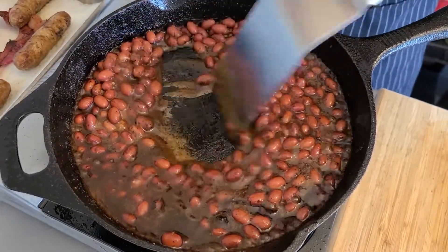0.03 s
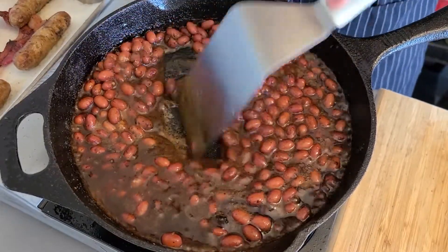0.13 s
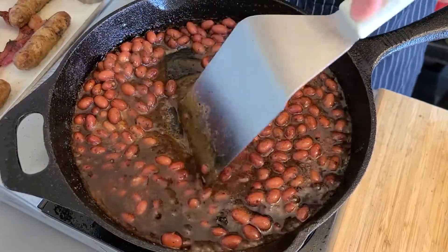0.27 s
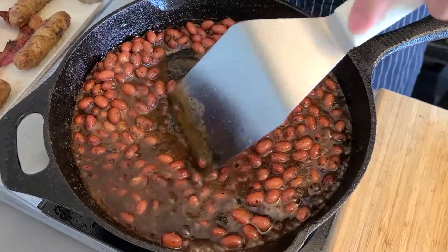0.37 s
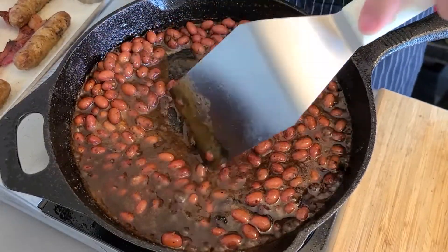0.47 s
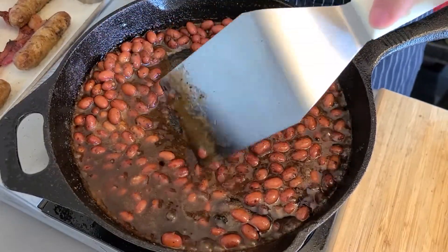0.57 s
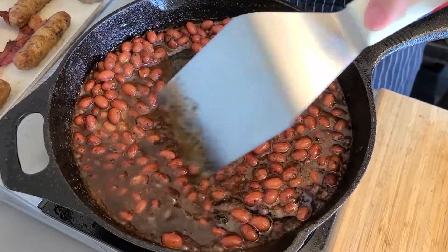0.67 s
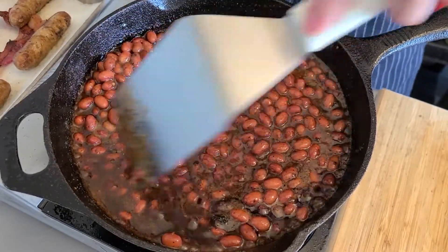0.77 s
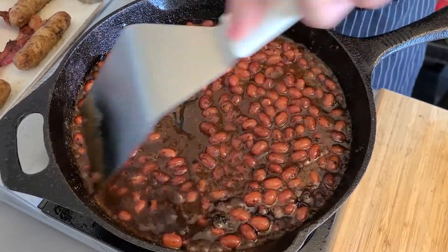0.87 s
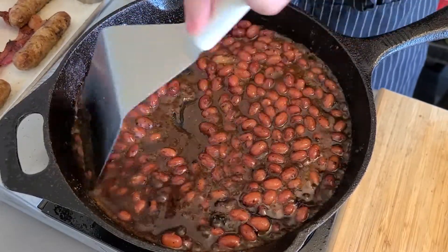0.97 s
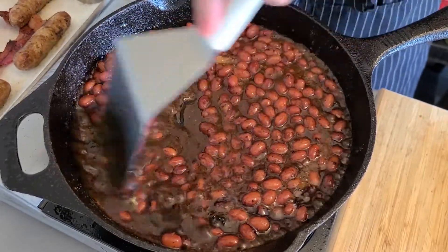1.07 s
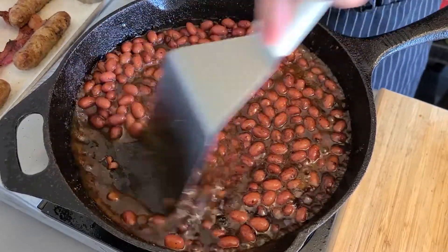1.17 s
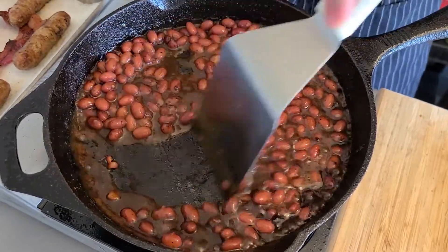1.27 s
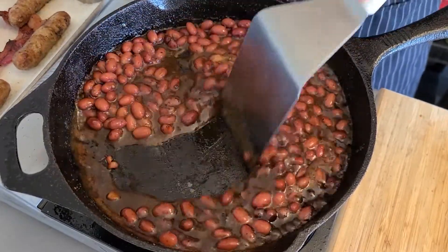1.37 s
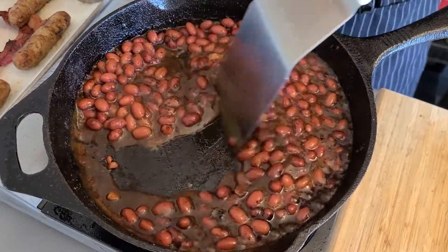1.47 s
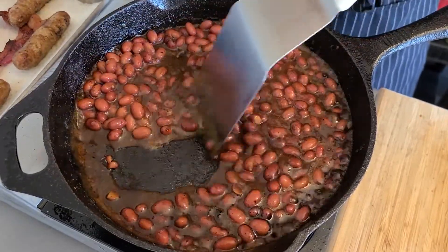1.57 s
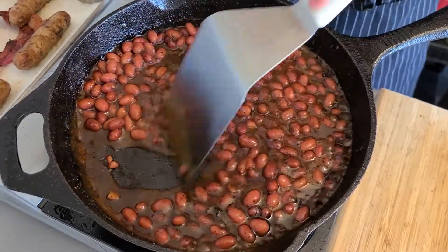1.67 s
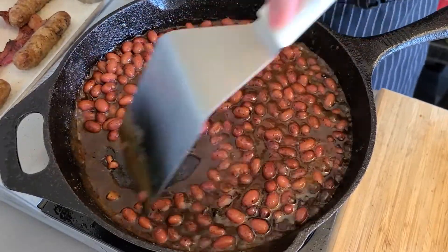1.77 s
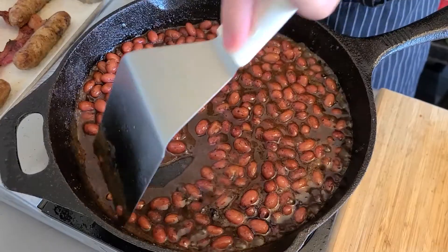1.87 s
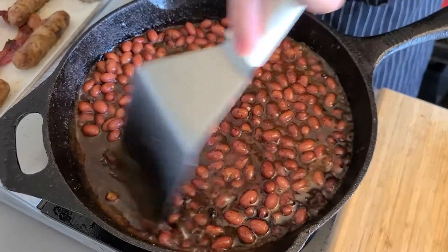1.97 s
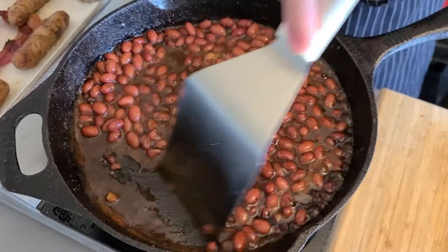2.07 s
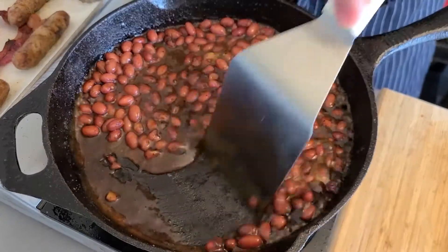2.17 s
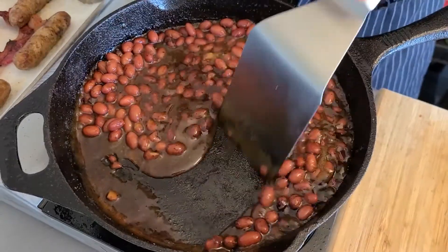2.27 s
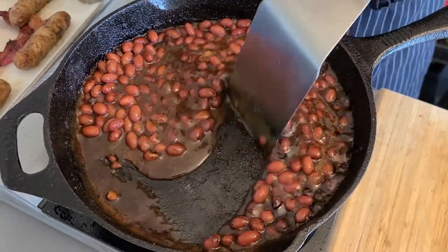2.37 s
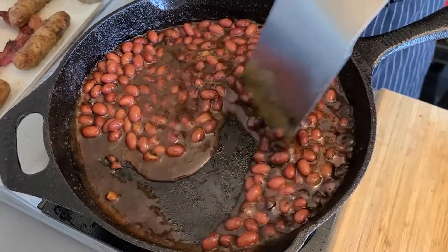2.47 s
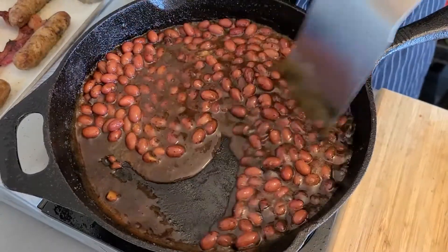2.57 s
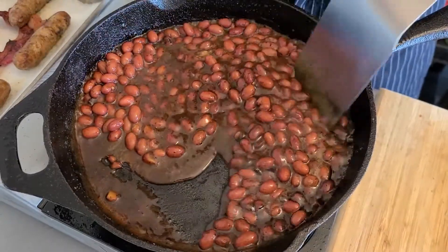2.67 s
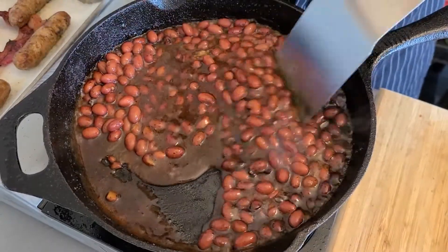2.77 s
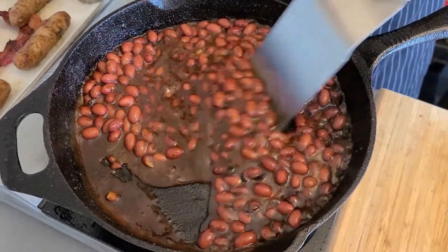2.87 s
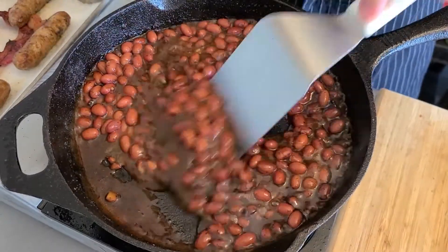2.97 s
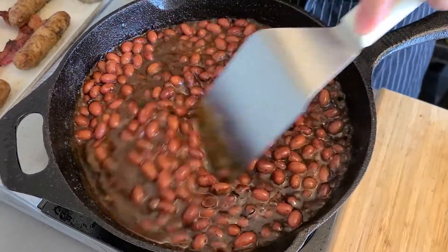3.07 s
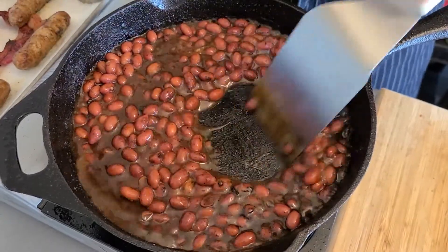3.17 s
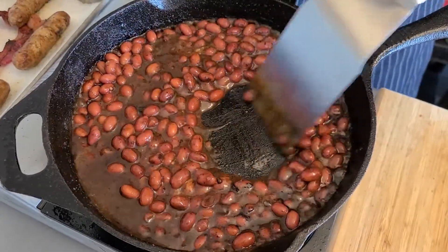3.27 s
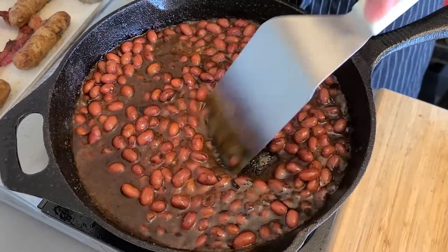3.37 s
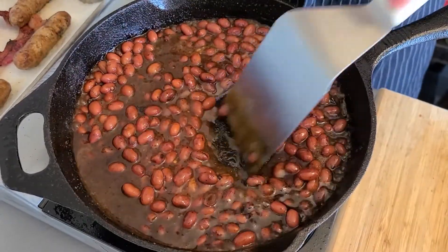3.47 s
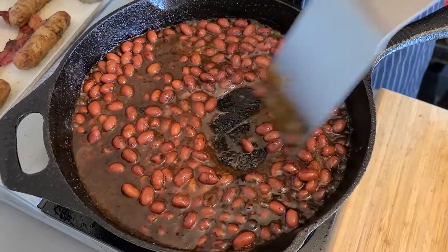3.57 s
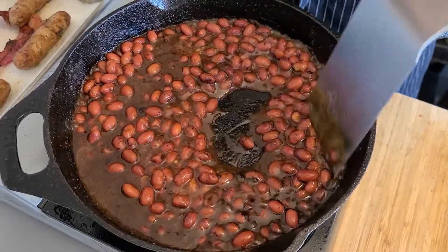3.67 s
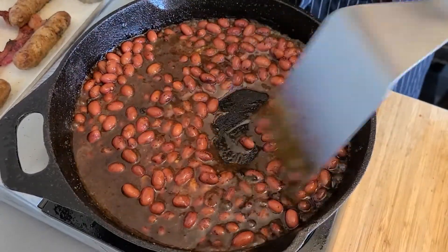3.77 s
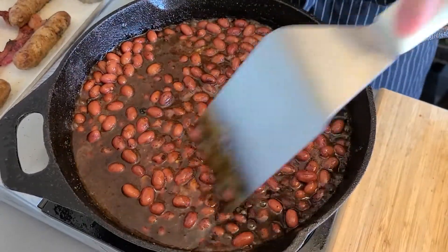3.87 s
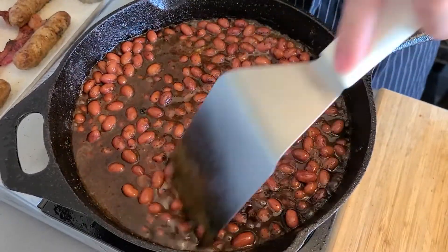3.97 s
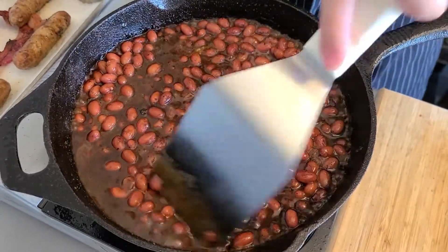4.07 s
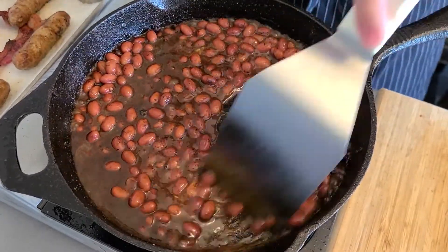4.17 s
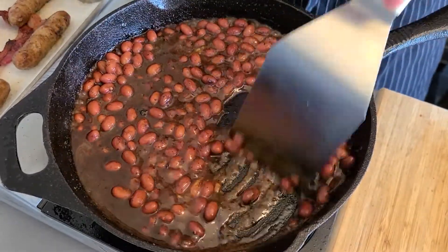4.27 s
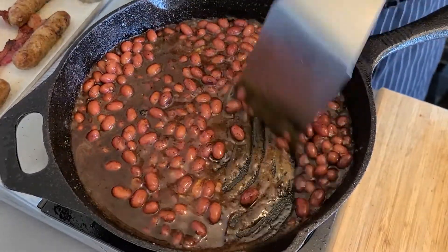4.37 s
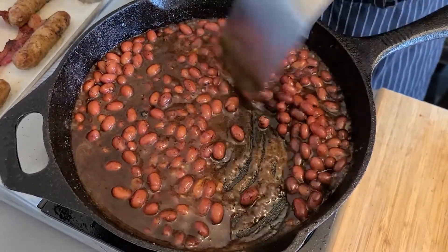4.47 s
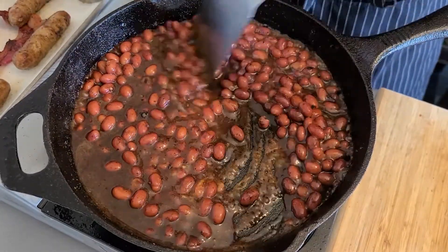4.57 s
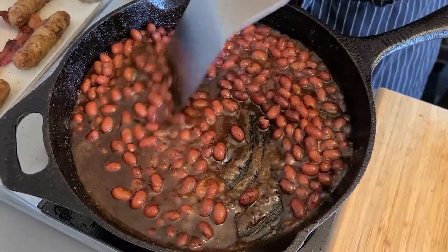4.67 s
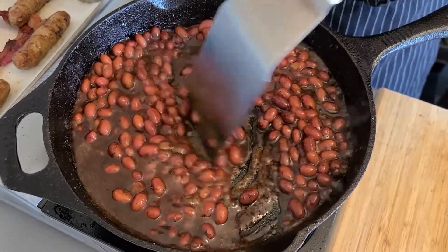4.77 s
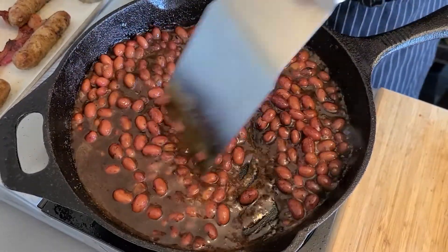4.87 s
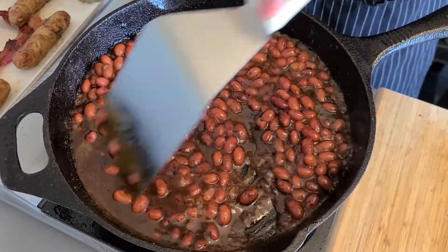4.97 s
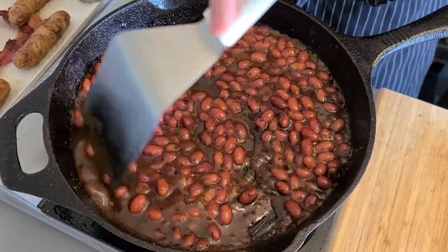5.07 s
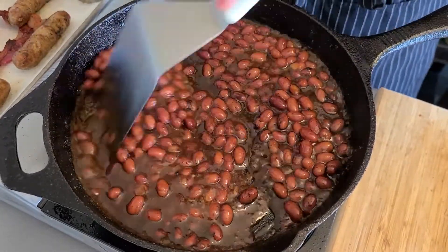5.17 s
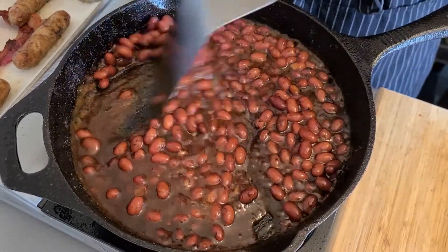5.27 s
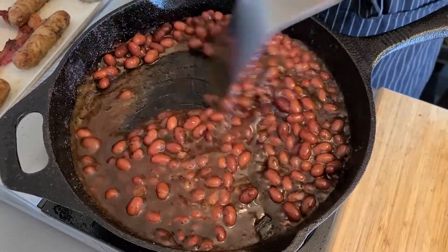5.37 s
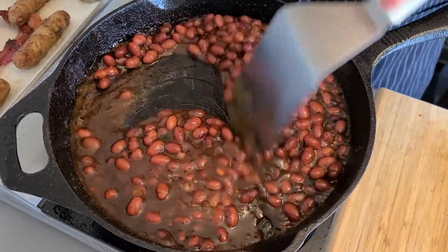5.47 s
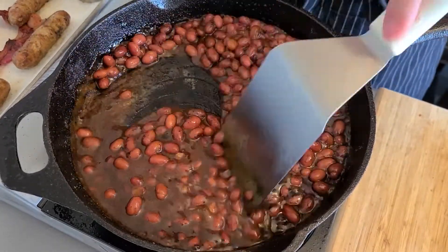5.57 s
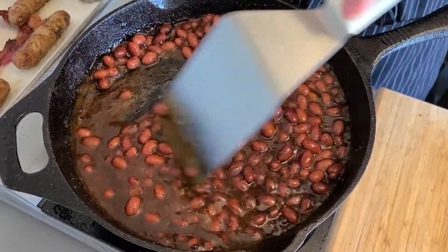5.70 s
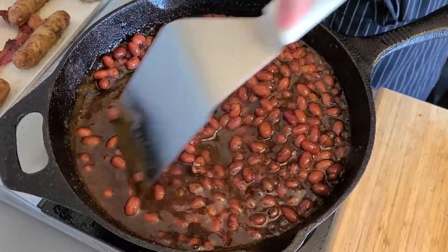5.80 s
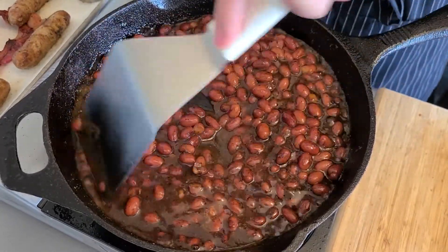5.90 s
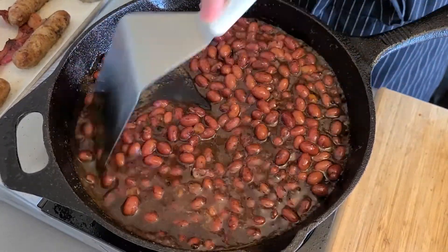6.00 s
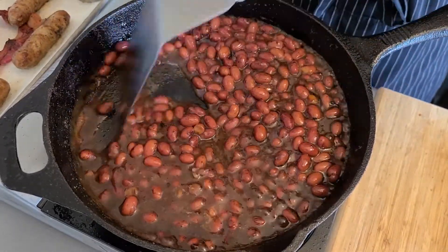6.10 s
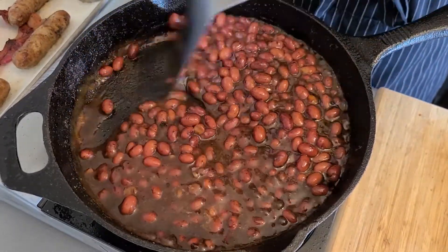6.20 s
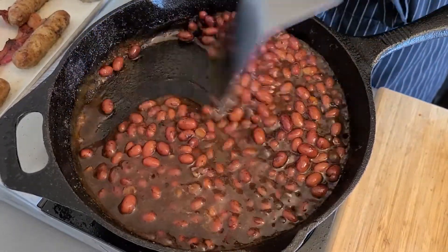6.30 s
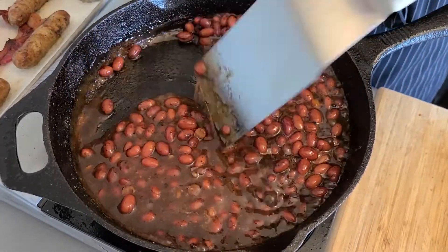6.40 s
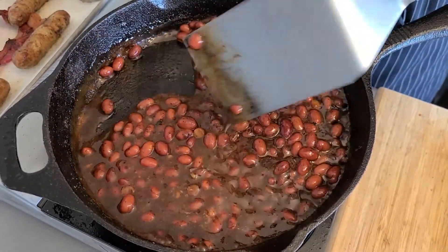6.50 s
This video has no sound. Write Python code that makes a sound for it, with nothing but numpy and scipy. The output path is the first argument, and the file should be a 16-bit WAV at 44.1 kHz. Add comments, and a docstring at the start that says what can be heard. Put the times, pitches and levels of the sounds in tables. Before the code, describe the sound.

A steel spatula scrapes and taps a cast-iron skillet in repeated gritty strokes, over a faint simmer and hob hum.

```python
"""A steel spatula stirs saucy beans in a cast-iron skillet, close by in a small kitchen.
From the start the hob hums and whines faintly, the sauce simmers, and the blade gives one short scrape.
Then, about once a second, it taps down and is pushed over the gritty iron: each slip sets blade and pan
ringing, and at times friction locks to one mode, which judders or sings. The walls reflect each stroke.
The last push dies away after about 6.3 s, leaving the hob and the sauce."""
import sys
import numpy as np
from scipy import signal
from scipy.fft import rfft, irfft
from scipy.io import wavfile
from scipy.ndimage import uniform_filter1d

SR = 44100
rng = np.random.default_rng(int(sys.argv[2]) if len(sys.argv) > 2 else 0)


def unload_wav(signal):
    """Save mono or channel-first audio to the path in sys.argv[1] as 16-bit WAV at rate SR, clipped to [-1, 1]."""
    wavfile.write(
        sys.argv[1],
        SR,
        np.round(np.clip(np.atleast_2d(signal).T, -1, 1) * 32767).astype(np.int16),
    )


N = 288414
TIME = np.arange(N) / SR

# Room rumble rising into the sizzle of the sauce: frequency_hz, density_db (power per hertz)
AMBIENT_SPECTRUM = [(10, -84.5), (40, -78.5), (85, -79.5), (200, -85), (600, -88.5), (1000, -90.5),
                    (2000, -92.5), (4000, -95), (7500, -95.5), (9500, -101), (12500, -99), (15500, -101)]
# Likeness of left and right in the room's sound: frequency_hz, coherence_ratio
ROOM_COHERENCE = [(50, 0.967), (200, 0.925), (700, 0.425), (2000, 0.052), (15000, 0.73)]
# Mains hum of the hob: pitch_hz, level_db
MAINS_HUM = [(59.6, -55.5), (118.6, -58.5)]
# Reverberation time of the kitchen: frequency_hz, t60_s
ROOM_DECAY = [(200, 0.2329), (700, 0.4013), (2500, 0.324), (7000, 0.4238), (14000, 0.03)]
# Strength of its reflections: frequency_hz, gain_db
ROOM_GAIN = [(200, -7), (600, -10), (1500, -7), (4000, -4.5), (8000, -14.5), (14000, -16.5)]
# Phase by which the left channel leads the right: frequency_hz, lead_rad
PHASE_LEAD = [(200, 0.23), (600, 0.27), (1400, 0.88), (2300, 0.83), (3200, 1.42), (4400, -1.6), (5400, 1.1),
              (6500, -.4), (10000, -.1), (16000, -.4)]
# Likeness of left and right in the direct sound: frequency_hz, coherence_ratio
DIRECT_COHERENCE = [(200, 0.989), (700, 0.9927), (1200, 0.515), (2300, 0.4), (3500, 0.122), (7500, 0.495),
                    (10000, 0.894), (16000, 0.48)]
# Resonances of blade and pan: frequency_hz, width_hz, height_db, left_minus_right_db
PAN_MODES = [(223.5, 44, 5, 0.5), (289, 27, 1.5, 0), (412, 73, 9.5, -0.5), (538.3, 85.2, 10.5, 0.33),
             (619.1, 86, 17, 3.5), (726.1, 98, 12, -1.6), (758.6, 10.3, 7, 9), (1101.7, 132, 6, 2),
             (1259, 59.3, 8, 0.5), (1424.3, 153, 8, 2), (1651, 51, 3.5, 7.5), (1843.7, 90, 7.5, -4),
             (2021.3, 143, 5.5, 3.5), (2273, 196, 3, -2.5), (2636.2, 32.7, 8.5, 3.5), (2792, 82, 1.5, -0.5),
             (3177.3, 238, 9, 3), (3648, 362, 6.5, -4.5), (4009, 215, 11, -4), (4326, 64, 6.5, -5.5),
             (4753, 240, 8, 0), (5312, 489, 11.5, -3.5), (6157, 790, 7, 0.26), (7061.6, 381, 12.5, -1.35),
             (8204, 680, 11, 9.5), (9063, 196, 6.5, -7.5), (10131, 757, 11.5, -1), (11566, 1390, 8, -3.8),
             (12427, 940, 11, 1), (15070, 2070, 9.5, -0.9)]
# The dense modes beneath those peaks: frequency_hz, relative_level_db
PAN_FLOOR = [(150, -30.5), (350, -31), (600, -25.5), (900, -25), (1200, -23), (2500, -27.5), (5000, -32.5),
             (7500, -33), (9500, -42.5), (15500, -42.5)]
# One blade mode sings as the contact passes it: peak_s, sigma_s, pitch_hz, relative_level_db
SINGING_MODES = [(1.103, 0.00407, 1990, -30.5), (1.103, 0.00417, 3170, -33), (1.103, 0.00423, 1421, -28.5),
                 (1.104, 0.00425, 5226, -30.5), (1.218, 0.0284, 5297, -32.5), (1.502, 0.014, 1118, -27),
                 (2.036, 0.00923, 1068, -23), (2.913, 0.0141, 1853, -27), (2.934, 0.0267, 3900, -28),
                 (2.969, 0.014, 3249, -23), (3.17, .012, 1291, -26.5), (3.367, 0.015, 3240, -22.5),
                 (3.376, .01, 2293, -24), (3.39, .011, 1293, -24.5), (4.051, 0.0168, 2594, -36.5),
                 (4.21, .05, 5350, -40), (4.224, .015, 11930, -31), (4.392, .035, 5354, -40),
                 (4.598, 0.00688, 829.6, -27.5), (4.602, 0.00732, 1145, -23), (4.637, 0.0165, 3229, -23),
                 (4.634, 0.0193, 3631, -27.5), (6.157, 0.01227, 1461, -22.5)]
# The blade sticks and slips in step with a bending mode: peak_s, rise_s, fall_s, pitch_hz, left_level_db
BLADE_JUDDERS = [(.072, 0.0396, 0.0228, 629, -23), (1.257, 0.0056, 0.0055, 580.8, -18.5),
                 (1.493, 0.0032, 0.0125, 610, -14.5), (2.147, 0.0118, 0.0174, 216, -33),
                 (2.799, 0.00415, 0.0142, 602, -27.5), (2.837, 0.00195, 0.0045, 616, -32),
                 (2.971, 0.0038, 0.00355, 624.1, -12), (3.281, 0.0031, 0.0103, 602, -27.5),
                 (3.326, 0.0135, 0.0074, 632.5, -13), (3.346, 0.0055, 0.0068, 615, -14),
                 (3.368, 0.007, 0.0072, 615, -10), (3.408, 0.0083, 0.0067, 605, -25),
                 (3.512, 0.0129, 0.0121, 599, -37.5), (4.587, 0.00216, 0.0134, 604.6, -13),
                 (4.63, 0.0087, 0.0157, 629.1, -18.5), (4.688, 0.0155, 0.0209, 600.3, -23.5),
                 (5.946, 0.00835, 0.00776, 620, -20), (6.07, 0.0184, 0.0405, 737, -26)]
# The edge lands or catches hard: start_s, relative_level_db
EDGE_TAPS = [(1.0974, -16), (1.1568, -22.5), (1.8855, -18.5), (2.0313, -14.5), (3.1492, -18), (3.175, -15),
             (4.0178, -12), (4.1944, -14.5), (4.2009, -13.5), (4.2208, -15.5), (4.2433, -16.5),
             (4.362, -24), (4.5835, -18.5), (4.6074, -21), (5.1267, -18.5), (5.2076, -24.5), (5.3288, -26),
             (5.3527, -18.5), (5.9234, -13.5), (6.097, -19)]
# Pushes over the iron: start_s, attack_s, hold_s, pressure_db, flex_db, bite_db, thud_db
# The last three (blade bending, grit, pan body) are relative to the pressure.
BLADE_PUSHES = [(0, 0.00067, 0.0067, -24.5, -3, -1, -14.5), (0.028, 0.0281, 0.031, -33, 5, -4, -15.5),
                (0.935, 0.00522, 0.041, -34.5, 3, .5, -24.5), (1.093, 0.00217, 0.0061, -31, 3, 0.5, -11.5),
                (1.165, 0.038, 0.0388, -21.5, 2, -0.5, -5.5), (1.259, 0.016, 0.0416, -39, -2.5, -1, -3.5),
                (1.414, 0.0707, 0.0186, -35, 10, -11, -8), (1.53, 0.0121, 0.0244, -41.5, 8.5, -11, -8),
                (1.878, .008, 0.048, -31.5, 3, 0.5, -15.5), (1.955, 0.0598, 0.0466, -23, 3.5, -4, -6.5),
                (2.064, 0.0354, 0.0311, -26, 4.5, -0.5, -2.5), (2.171, 0.0325, 0.0588, -44, 6, -4, 0),
                (2.277, 0.0447, 0.0274, -34, 3, -4, -7.5), (2.781, 0.0095, 0.0163, -35.5, 4.5, -6.5, -10.5),
                (2.832, 0.0874, 0.027, -27.5, 4.5, -6, -14.5), (2.908, 0.0431, 0.0541, -24, 0.5, -2.5, -24),
                (3.136, 0.027, 0.0166, -29, 1.5, 5, -24.5), (3.29, 0.0577, 0.0354, -23.5, 2.5, -1.5, -26),
                (4.017, 0.00299, 0.0253, -35.5, 3.5, -3, -17), (4.069, 0.0611, 0.074, -28, 0.5, -5, -13.5),
                (4.168, 0.0275, 0.0376, -26, 0.5, -2.5, -8.5), (4.261, 0.0164, 0.023, -35, 0, -2, -10.5),
                (4.336, 0.0254, 0.0834, -34, -1, -6.5, -12.5), (4.583, 0.00105, 0.0263, -24.5, 4, -10, -27),
                (4.592, 0.0203, 0.0587, -28, 3.5, -5, -19.5), (5.13, 0.00186, 0.0102, -36, -8, -.5, -26.5),
                (5.176, 0.0259, 0.0369, -37.5, -6, 2.5, -14.5), (5.338, 0.0175, 0.0526, -30, 0, -1, -14),
                (5.402, 0.0611, 0.0706, -33.5, 4.5, 4, -11), (5.921, 0.00414, 0.0227, -29.5, -1, 2, -27),
                (5.995, 0.0333, 0.0168, -27, 3.5, -2, -7), (6.071, 0.069, 0.0753, -29, 3.5, -0.5, -11),
                (6.203, 0.0492, 0.0602, -27.5, 0, -1.5, -10.5)]


def gain_of(db):
    """Amplitude grows tenfold for every 20 dB."""
    return 10 ** (np.asarray(db) / 20)


def unit_rms(x):
    """Normalisation to a mean power of 1."""
    return x / np.sqrt(np.mean(x ** 2) + 1e-20)


def curve_at(points, hz):
    """Interpolation of a spectrum on a logarithmic frequency axis."""
    frequencies, values = np.transpose(points)
    return np.interp(np.log(hz + 1), np.log(frequencies + 1), values)


def wander(hz):
    """Smooth random modulation of rms 1, with a bandwidth of roughly hz."""
    knots = rng.standard_normal(8192)
    position = np.minimum(TIME * 2 * hz, len(knots) - 2)
    k = position.astype(int)
    ease = (position - k) ** 2 * (3 - 2 * (position - k))
    return unit_rms(knots[k] * (1 - ease) + knots[k + 1] * ease)


def impulses(per_s, spread_db):
    """A Poisson process: independent impulses, mostly small and a few large."""
    sizes = gain_of(spread_db * np.minimum(rng.exponential(1, N), 4))
    return sizes * (rng.random(N) < per_s / SR)


def convolve(x, response):
    """A linear system's output is its input convolved with its impulse response."""
    return signal.oaconvolve(np.atleast_2d(x), response, axes=1)[:, :N]


def stereo_pair(left, other, coherence):
    """Partial coherence: the right channel shares a part of the left at each frequency."""
    shared = np.clip(curve_at(coherence, np.fft.rfftfreq(N, 1 / SR)), -1, 1)
    right = irfft(shared * rfft(left) + np.sqrt(1 - shared ** 2) * rfft(other), N)
    return np.array([left, right])


def pan_ring(lo_hz, hi_hz, ripple_db=0, size=4096, order=10):
    """Modal resonance: the impulse response of blade and pan in one band, with unit mid-channel energy."""
    hz = np.fft.rfftfreq(size, 1 / SR) + 1
    sides = np.array([[.5], [-.5]])
    peaks_db = sum((height + sides * balance) / (1 + (2 * (hz - centre) / width) ** 2)
                   for centre, width, height, balance in PAN_MODES)
    # each point of contact favours its own random set of the dense modes
    grid = np.linspace(0, np.sqrt(SR / 2), num=170)
    ripple = np.interp(np.sqrt(hz), grid, rng.standard_normal(len(grid)))
    # short waves reach left and right with different peaks and dips
    apart = np.minimum(hz / 6000, 1) * np.interp(np.sqrt(hz), grid, rng.standard_normal(len(grid)))
    db = curve_at(PAN_FLOOR, hz) + peaks_db + ripple_db * (ripple + sides * apart)
    gain = gain_of(db) / np.sqrt((1 + (lo_hz / hz) ** order) * (1 + (hz / hi_hz) ** order))
    # folding the cepstrum gives a causal, minimum-phase ring
    cepstrum = irfft(np.log(gain + 1e-6))
    cepstrum[:, 1:size // 2] *= 2
    cepstrum[:, size // 2:] = 0
    spectrum = np.exp(rfft(cepstrum))
    spectrum[1] *= np.exp(-1j * curve_at(PHASE_LEAD, hz))
    ring = np.roll(irfft(spectrum), 16, axis=1)[:, :size // 2]
    return ring / np.linalg.norm(ring.mean(0))


def rumble_and_sizzle(flutter_db=0.5):
    """Spectrally shaped noise: the room's low rumble and the soft, slightly uneven sizzle of the sauce."""
    colour = gain_of(curve_at(AMBIENT_SPECTRUM, np.fft.rfftfreq(N, 1 / SR))) * np.sqrt(SR / 2)
    noise = stereo_pair(*rng.standard_normal((2, N)), ROOM_COHERENCE)
    noise *= gain_of(flutter_db * wander(hz=30.94))
    return irfft(rfft(noise) * colour, N)


def hob(whine_hz=6892.6, whine_db=-58.5, drift_hz=16, pulse_depth=0.515, flicker_db=3.5):
    """Amplitude modulation: a thin whine pulses at the mains frequency, above the mains hum."""
    hum = sum(gain_of(db) * np.sin(2 * np.pi * np.cumsum(hz + 0.295 * wander(hz=2.35)) / SR)
              for hz, db in MAINS_HUM)
    phase = 2 * np.pi * np.cumsum(whine_hz + drift_hz * wander(hz=59.94)) / SR
    mains_hz = MAINS_HUM[0][0]
    pulse = gain_of(whine_db) * (1 + pulse_depth * np.sin(2 * np.pi * mains_hz * TIME))
    # the moving hand shifts the whine's reflections, differently on each side
    whine = np.zeros((2, N))
    for side in range(2):
        flicker = gain_of(flicker_db * wander(hz=17))
        whine[side] = pulse * flicker * np.sin(phase + 1.154 * wander(hz=9.1))
    hum *= 1 + 0.061 * wander(hz=8)
    return np.sqrt(2) * (hum + whine)


def simmer(level_db=-68):
    """Shot noise: tiny bubbles burst in the sauce and excite the pan's upper modes."""
    pops = unit_rms(impulses(per_s=90, spread_db=4.0))
    return gain_of(level_db) * convolve(pops, pan_ring(lo_hz=1468, hi_hz=14700))


def kitchen_reverb(direct, delay_s=0.0043, echoes_per_s=3000):
    """Reverberation: reflections from counter and walls decay exponentially, each band at its own rate."""
    echoes = rng.choice([-1., 1.], (2, SR)) * (rng.random((2, SR)) < echoes_per_s / SR)
    echoes[:, :round(delay_s * SR)] = 0
    hz, t, bands = signal.stft(echoes, SR, nperseg=256)
    shared = np.clip(curve_at(ROOM_COHERENCE, hz), 0, 1)[:, None]
    bands[1] = shared * bands[0] + np.sqrt(1 - shared ** 2) * bands[1]
    decay_per_s = np.log(1000) / curve_at(ROOM_DECAY, hz)[:, None]
    envelope = np.exp(-decay_per_s * t) * np.sqrt(2 * decay_per_s)  # unit energy
    bands *= gain_of(curve_at(ROOM_GAIN, hz))[:, None] * envelope
    response = signal.istft(bands, SR, nperseg=256)[1] / np.linalg.norm(echoes[0])
    return convolve(direct, response)


def singing(gain_db=-2, base_width_hz=45, width_share=0.0047):
    """Narrow-band resonance: friction feeds a single mode for a moment, giving a fuzzy metallic tone."""
    out = np.zeros((2, N))
    for peak_s, sigma_s, hz, db in SINGING_MODES:
        near = abs(TIME - peak_s) < 3 * sigma_s
        t = TIME[near] - peak_s
        pole = np.exp(-np.pi * (base_width_hz + width_share * hz) / SR)
        fuzz = signal.lfilter([1], [1, -pole], rng.standard_normal((2, SR))[:, :len(t)])
        motion = (fuzz[0] + 1j * fuzz[1]) * np.exp(2j * np.pi * hz * t)
        swell = np.exp(-.5 * (t / sigma_s) ** 2)
        motion *= swell * np.sqrt(2 * np.sum(swell ** 2) / np.sum(abs(motion * swell) ** 2))
        right_lag = np.exp([[0], [-1j * curve_at(PHASE_LEAD, hz)]])
        out[:, near] += gain_of(db + gain_db) * (motion * right_lag).real
    return out


def juddering(jitter=0.02602, overtone_db=-19, right_db=-3, lead_rad=0.2):
    """Self-excited oscillation: stick-slip locks to the bending blade in a short, rough groan."""
    out = np.zeros((2, N))
    wavering_time = np.cumsum(1 + jitter * wander(hz=119.23)) / SR
    for peak_s, rise_s, fall_s, hz, db in BLADE_JUDDERS:
        near = abs(TIME - peak_s) < .12
        t = TIME[near] - peak_s
        swell = gain_of(db) * np.exp(-.5 * (t / np.where(t < 0, rise_s, fall_s)) ** 2)
        phase = 2 * np.pi * (hz * wavering_time[near] + rng.random()) - np.array([[0], [lead_rad]])
        out[:, near] += swell * np.sqrt(2) * (np.sin(phase) + gain_of(overtone_db) * np.sin(2 * phase))
    return out * gain_of([[0], [right_db]])


def tapping(gain_db=15, bending_db=-5, rattle=0.29, rattle_s=0.00381):
    """Impact excitation: a sharp contact and a brief buzz of the edge ring the metal and bend the blade."""
    t = np.arange(800) / SR
    blows = np.zeros((2, N))
    for start_s, db in EDGE_TAPS:
        blow = rattle * rng.standard_normal((2, len(t))) * np.exp(-t / rattle_s)
        blow[:, 0] += 1  # the contact itself
        blow /= np.linalg.norm(blow, axis=1, keepdims=True)
        at = round(start_s * SR)
        blows[:, at:at + len(t)] += blow * gain_of(db + gain_db)
    ring = pan_ring(lo_hz=1222, hi_hz=20000) + gain_of(bending_db) * pan_ring(lo_hz=415, hi_hz=1323)
    return convolve(stereo_pair(*blows, DIRECT_COHERENCE), ring)


def push_envelope(t, attack_s, hold_s, touch_db=-16, release_db_per_s=411.5,
                  drag_db=-13, drag_db_per_s=134):
    """Exponential growth and decay: a push swells from first touch, holds, and lets go into a light drag."""
    swell = gain_of(touch_db * np.clip(1 - t / attack_s, 0, 1))
    released_s = np.maximum(t - attack_s - hold_s, 0)
    release = gain_of(-release_db_per_s * released_s)
    drag = gain_of(drag_db - drag_db_per_s * released_s)
    return swell * np.maximum(release, drag)


def stroke_envelopes():
    """Friction noise grows with pressure: the strongest push sets scrape, flex, bite and thud."""
    levels = np.zeros((4, N))
    for start_s, attack_s, hold_s, pressure_db, flex_db, bite_db, thud_db in BLADE_PUSHES:
        near = (TIME >= start_s) & (TIME < start_s + .5)
        band_gains = gain_of(pressure_db + np.array([0, flex_db, bite_db, thud_db]))
        envelope = push_envelope(TIME[near] - start_s, attack_s, hold_s)
        levels[:, near] = np.maximum(levels[:, near], np.outer(band_gains, envelope))
    return levels


def slip_force(rub=0.6, chatter_db=2):
    """Surface roughness: the edge trips over the iron's grain in clumps of clicks, over a smooth rub."""
    slips = impulses(per_s=3200, spread_db=3.5)
    clumps = gain_of(chatter_db * wander(hz=220.07))
    forces = []
    for _ in range(2):
        clicks = unit_rms(slips * rng.choice([-1, 1], N))
        force = (clicks + rub * rng.standard_normal(N)) * clumps
        # the hand keeps the mean force steady, however the clicks fall
        forces.append(force / np.sqrt(uniform_filter1d(force ** 2, size=900) + 1e-9))
    return stereo_pair(*forces, DIRECT_COHERENCE)


def travelling_ring(force, lo_hz, hi_hz, ripple_db=3.5, size=5000):
    """Mode strength depends on the driving point: as the contact travels, one ring fades into the next."""
    out = np.zeros((2, N + 2 * size))
    fade = signal.windows.hann(size, sym=False)
    force = np.pad(force, ((0, 0), (size // 2, size)))
    for at in range(0, N, size // 2):
        part = force[:, at:at + size] * fade
        if abs(part).max() > 1e-6:
            sound = signal.fftconvolve(part, pan_ring(lo_hz, hi_hz, ripple_db), axes=1)
            out[:, at:at + sound.shape[1]] += sound
    return out[:, size // 2:][:, :N]


def scraping(thud_db=-2, flex_db=0.77, bite_db=-0.7674):
    """Forced vibration: one train of slips drives the pan's thud, the blade's bending and the bright grit."""
    scrape, flex, bite, thud = stroke_envelopes()
    force = slip_force()
    return (travelling_ring(force * thud * gain_of(thud_db), lo_hz=185, hi_hz=430)
            + travelling_ring(force * flex * gain_of(flex_db), lo_hz=470, hi_hz=900)
            + travelling_ring(force * scrape, lo_hz=900, hi_hz=2500)
            + travelling_ring(force * bite * gain_of(bite_db), lo_hz=2500, hi_hz=18000))


def scene():
    """Superposition: the spatula's direct sound and its reflections add to the steady background."""
    spatula = scraping() + tapping() + juddering() + singing()
    return spatula + kitchen_reverb(spatula) + rumble_and_sizzle() + hob() + simmer()


def record(dry, cutoff_hz=15900):
    """Band limiting: a linear-phase low-pass filter removes the highest treble."""
    lowpass = signal.firwin(255, cutoff_hz, window=("kaiser", 9), fs=SR)
    return signal.oaconvolve(dry, lowpass[None], "same", axes=1)


dry = scene()
out = record(dry)
unload_wav(out)
```